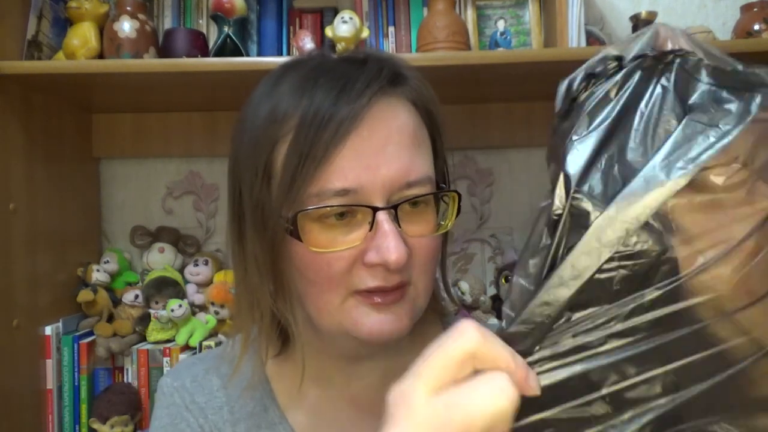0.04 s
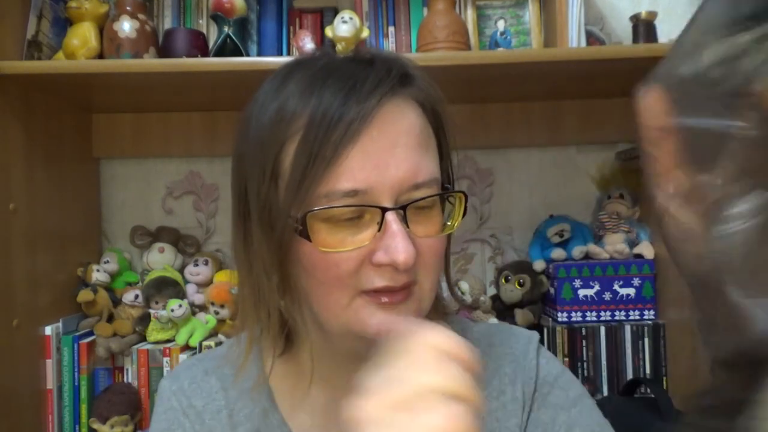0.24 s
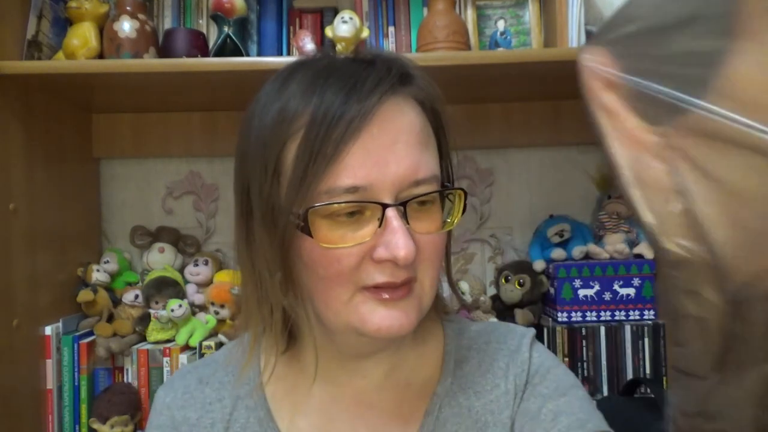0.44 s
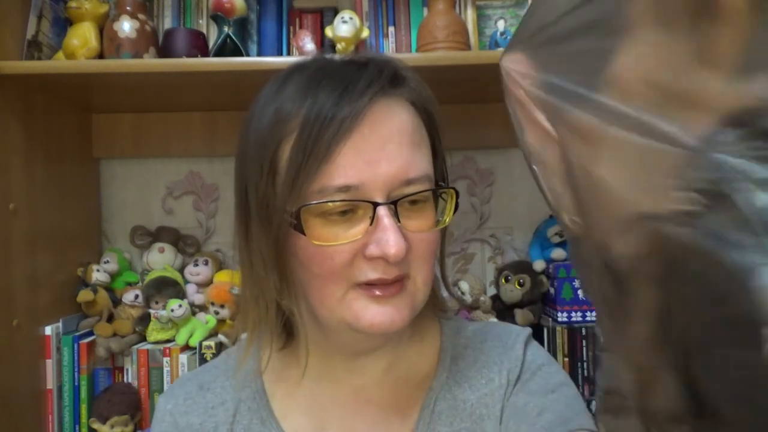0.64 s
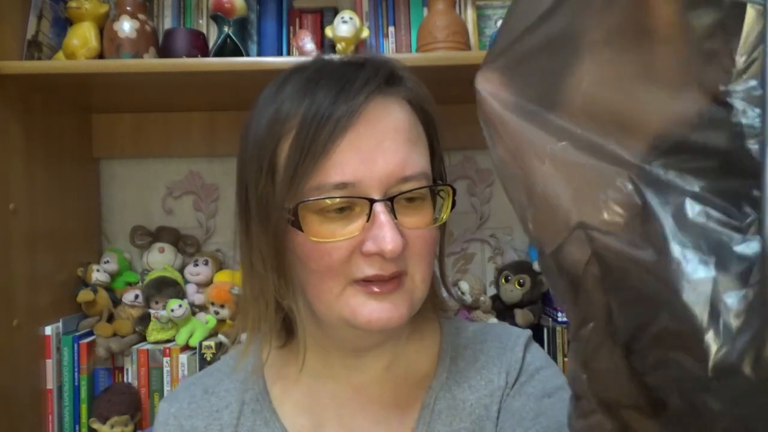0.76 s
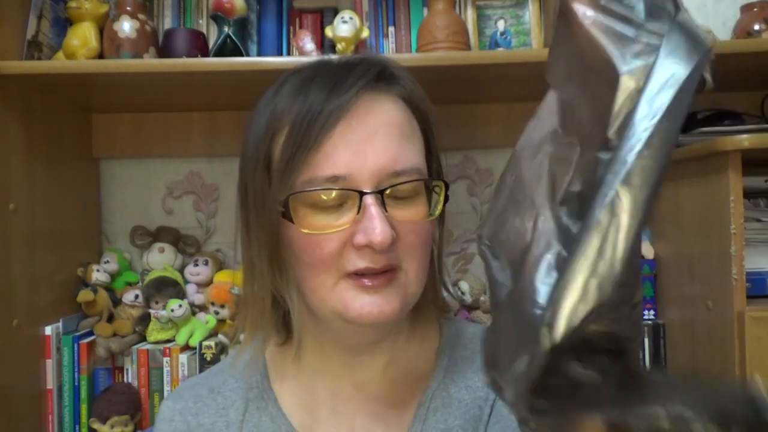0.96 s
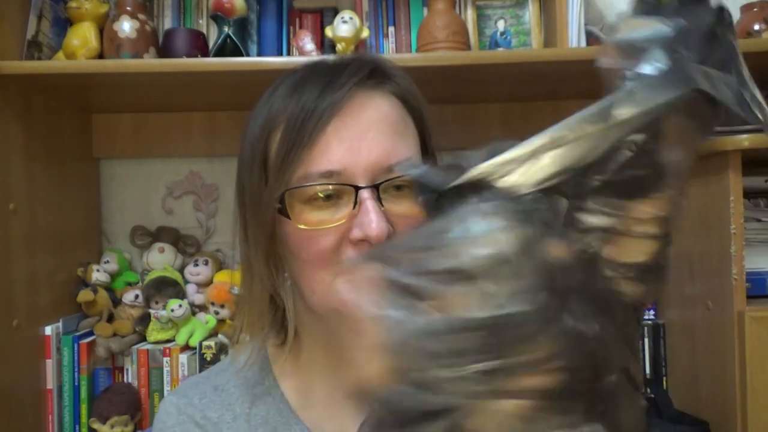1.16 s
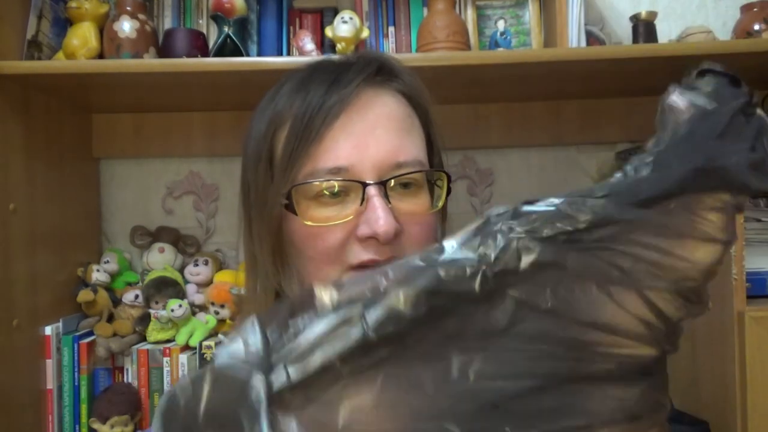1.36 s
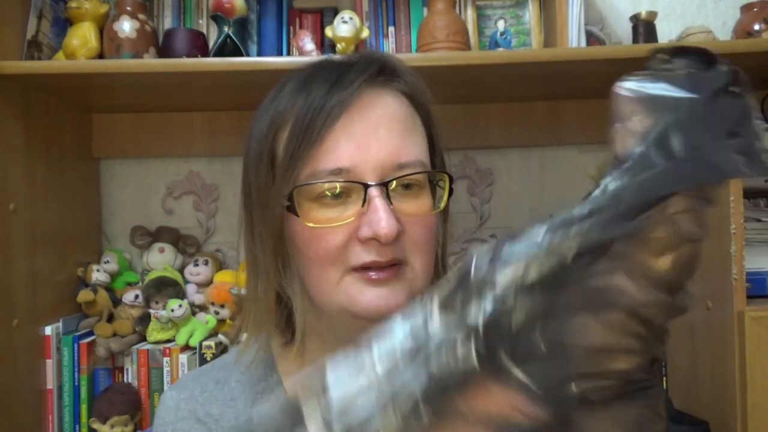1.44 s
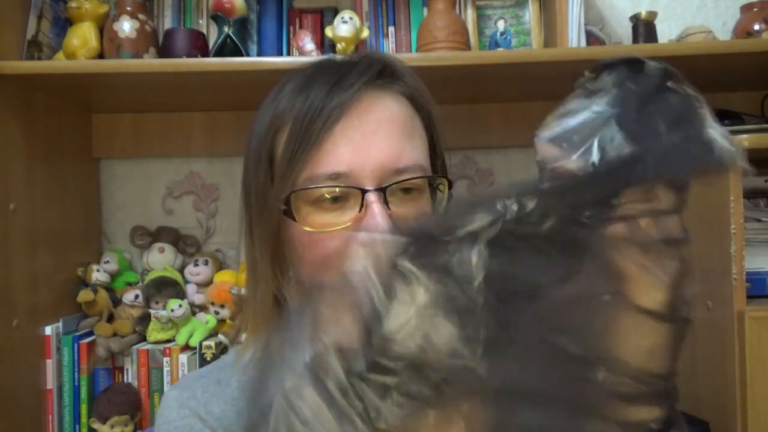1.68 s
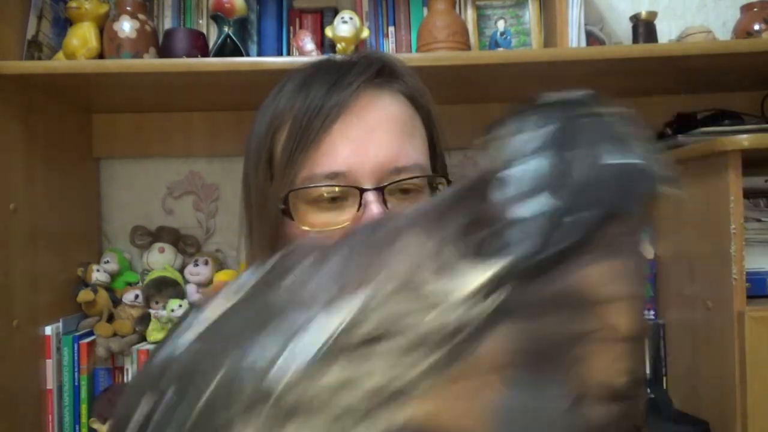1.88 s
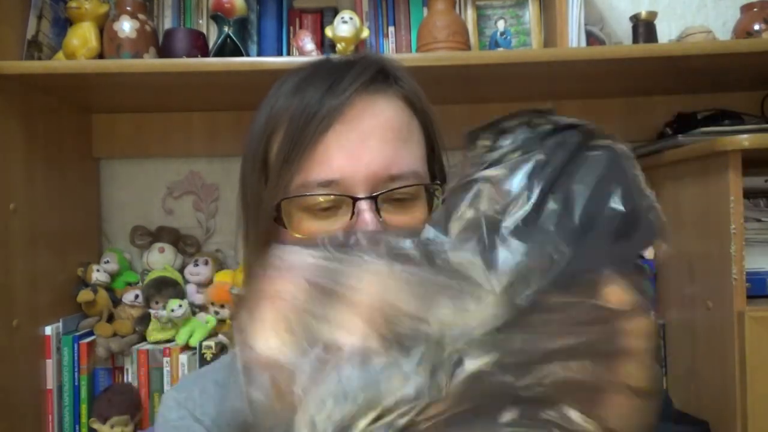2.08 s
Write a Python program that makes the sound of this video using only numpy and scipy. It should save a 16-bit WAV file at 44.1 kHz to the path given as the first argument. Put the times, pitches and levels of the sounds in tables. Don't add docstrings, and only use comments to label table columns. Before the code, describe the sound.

A thin plastic rubbish bag crinkles loudly and densely close by, tugged in uneven bursts indoors

```python
import sys
import numpy as np
from scipy import signal
from scipy.fft import rfft, irfft, next_fast_len
from scipy.io import wavfile
from scipy.ndimage import uniform_filter1d, map_coordinates

SR = 44100
rng = np.random.default_rng(int(sys.argv[2]) if len(sys.argv) > 2 else 0)


def transcribe(u):
    v = np.clip(np.atleast_2d(u).T, -1, 1)
    q = np.round(v * 32767).astype(np.int16)
    wavfile.write(sys.argv[1], SR, q)


def gain_from_db(level_db):
    decades = np.asarray(level_db, float) / 20
    return 10 ** decades


N = 93227


def unit(x):
    return x / np.sqrt(np.mean(x ** 2) + 1e-20)


def along(points, hz):
    f, v = np.transpose(points)
    return np.interp(np.log(hz + 1), np.log(f + 1), v)


def curve(rows, column=1):
    columns = np.transpose(rows)
    return np.interp(np.arange(N) / SR, columns[0], columns[column])


def wobble(rate_hz):
    knots = rng.standard_normal(int(N * rate_hz / SR) + 4)
    return map_coordinates(knots, [np.arange(N) * rate_hz / SR])


def coloured(x, points, causal=True):
    m = 2 * next_fast_len(N // 2 + SR // 8)
    gain = gain_from_db(along(points, np.fft.rfftfreq(m, 1 / SR)))
    cepstrum = irfft(np.log(gain), m)
    if causal:
        cepstrum[1:m // 2] *= 2
        cepstrum[m // 2 + 1:] = 0
    return irfft(rfft(x, m) * np.exp(rfft(cepstrum)), m)[..., :N]


def grains(s, hz, size, cycles, count):
    k = np.arange(count)
    turns = hz[:, None] * k / SR
    envelope = np.exp(-np.log(10) * turns / cycles) * (1 - np.exp(-turns / 0.96))
    shapes = size[:, None] * np.sin(2 * np.pi * turns) * envelope
    at = np.round(s * SR).astype(int)[:, None] + k
    return np.bincount(at.ravel(), shapes.ravel(), N + count)[:N]


# t/s, level/dB
HANDLING = [(0, -21.5), (.072, -22.5), (.11, -17.5), (.165, -27), (.27, -17.5), (.33, -20.5), (.375, -27.5),
            (.52, -27), (.6, -22.5), (1.0, -17.5), (1.3, -19.5), (1.34, -26), (1.585, -22.5), (1.615, -17),
            (1.73, -17.5), (1.79, -25.5), (1.99, -23), (2.05, -22)]
# middle t/s, length/s, lift/dB
TUGS = [(0.03, 0.023, 0.5), (0.078, 0.013, -2), (0.143, 0.014, 3.5), (0.189, .03, 4), (0.247, .008, 2),
        (0.33, 0.029, -0.5), (0.342, 0.016, 1.5), (.395, .025, -2), (0.417, 0.014, 3), (0.472, 0.032, 4.5),
        (0.597, .04, 3.5), (0.642, 0.057, 3), (0.746, 0.038, 2), (0.818, .03, -3), (0.884, .05, 1),
        (.918, 0.033, -4), (0.97, 0.018, -3.5), (1.006, 0.061, 1), (1.162, 0.048, 2), (1.205, 0.038, 2.5),
        (1.437, 0.032, 3), (1.483, .022, 1), (1.52, .03, -1.5), (1.66, .03, 0.5), (1.689, 0.029, 2),
        (1.749, 0.029, 2), (1.838, 0.071, 5), (1.947, 0.026, 0.5), (1.966, .015, -1), (2.067, 0.097, 3)]


def effort_db():
    t = np.arange(N) / SR
    tugs = sum(lift_db * np.exp(-.5 * ((t - s) / (0.35 * length_s)) ** 2)
               for s, length_s, lift_db in TUGS)
    tremor = 0.49 * wobble(45.2) + 0.76 * wobble(160)
    return curve(HANDLING) + tugs + tremor


CREASES_PER_S, RING_CYCLES, TICK_DB = 9000, 1.68, -2
SIZE_SPREAD_DB, SPARSER_PER_DB, BIGGEST_DB = 2, 0.045, 11


def crackle(level_db):
    count = int(CREASES_PER_S * N / SR)
    ring_u, hz_u, ring_size_u, sign_u, tick_u, tick_size_u = rng.random((6, count))
    spread_db = SIZE_SPREAD_DB * (1.5 + SPARSER_PER_DB * (level_db.mean() - level_db))

    def size(at, u):
        db = np.minimum(-spread_db[at] * np.log(1 - u), BIGGEST_DB)
        return gain_from_db(db) * np.sign(sign_u - .5)

    s = ring_u * N / SR
    hz = 1200 + 15500 * hz_u
    ring_size = size((s * SR).astype(int), ring_size_u) * np.sqrt(hz)
    rings = grains(s, hz, ring_size, RING_CYCLES, count=96)
    tick_at = (tick_u * N).astype(int)
    ticks = np.bincount(tick_at, size(tick_at, tick_size_u), N)
    return unit(rings) + gain_from_db(TICK_DB) * unit(ticks)


def slide():
    z = signal.stft(rng.standard_normal(N), nperseg=256)[2]
    patches = uniform_filter1d(rng.standard_normal(z.shape), 5, 0)
    patches = uniform_filter1d(patches, 12, 1)
    return unit(signal.istft(z * gain_from_db(2.7 * unit(patches)), nperseg=256)[1][:N])


SLIDE_DB = -0.5
# f/Hz, level/dB
FILM_SPECTRUM = [(25, -29), (60, -20), (500, -12.5), (1200, -14.5), (4000, -10.5), (9000, -6.5),
                 (15500, -10)]


def rustle():
    level_db = effort_db()
    source = crackle(level_db) + gain_from_db(SLIDE_DB) * slide()
    return gain_from_db(level_db) * unit(coloured(source, FILM_SPECTRUM))


# f/Hz, level/dB
TAUT_CHANGE = [(100, -4), (1000, -2.5), (4000, -1.5), (7000, -1), (11000, .5), (13000, 2), (15500, 4)]


def stretch(slack, taut):
    return (1 - taut) * slack + taut * coloured(slack, TAUT_CHANGE, causal=False)


def room_air():
    shape = [(25, -34), (60, 1.5), (300, -3.5), (2000, -17), (16000, -40)]  # f/Hz, level/dB
    return gain_from_db(-61.5) * unit(coloured(rng.standard_normal(N), shape))


# f/Hz, level/dB
SHADE_CHANGE = [(300, 5.5), (3000, 2.5), (6500, .5), (8000, -4), (9500, -10), (10900, -13), (11700, 0),
                (15000, 5.5)]


def arm_shade(front, shade):
    return (1 - shade) * front + shade * coloured(front, SHADE_CHANGE, causal=False)


# f/Hz, t60/s
ROOM_T60 = [(200, 0.31), (2000, 0.26), (12000, 0.11)]
ROOM_CHANGES_S = .15


def room(x):
    hop = int(ROOM_CHANGES_S * SR)
    out = np.zeros((2, N + SR))
    padded = np.pad(x, (hop, 2 * hop))
    fade = np.hanning(2 * hop) ** .5
    for at in range(-hop, N, hop):
        hz, t, z = signal.stft(rng.standard_normal((2, SR // 3)), SR, nperseg=256)
        decay_db = -60 * t / along(ROOM_T60, hz)[:, None]
        tail = signal.istft(z * gain_from_db(decay_db), SR, nperseg=256)[1]
        tail = tail / np.linalg.norm(tail[0])
        piece = padded[at + hop:at + 3 * hop] * fade
        wet = signal.fftconvolve(piece[None], tail, axes=1)
        out[:, at + hop:][:, :wet.shape[1]] += wet
    return out[:, hop - SR // 400:][:, :N]


# f/Hz, level/dB
PORTS_UNLIKE = [(100, -19), (400, -22.5), (1500, -33.5), (6000, -20), (9000, -17.5), (11300, -15.5),
                (12500, -30)]
# f/Hz, level/dB
RIGHTWARD = [(100, -32), (250, -18), (600, -7), (1500, -13.5), (3000, -9.5), (5000, -15.5), (8000, -20),
             (15000, -23)]


def two_ports(mid, other, aside):
    side = coloured(other, PORTS_UNLIKE) - aside * coloured(mid, RIGHTWARD, causal=False)
    return np.array([mid + side, mid - side])


# t/s, level/dB, f/Hz
SNAPS = [(0.0202, -10, 9000), (.082, -5, 12000), (.167, -16, 9500), (0.2297, -2.5, 6000),
         (0.3758, -7, 8050), (.412, -10.5, 6000), (0.4135, -9, 12400), (0.43, -8, 12500),
         (0.837, -3, 11200), (0.8691, -3, 8200), (.319, -4, 12500), (.352, -12, 13000), (1.041, 2, 9100),
         (1.3243, -10, 9000)]
SNAP_DB = 3


def snaps():
    s, db, hz = np.transpose(SNAPS)
    size = gain_from_db(db + SNAP_DB)
    crack = grains(s - .0002, .8 * hz, size, 1.3, count=32)
    high_ring = grains(s, hz, 0.59 * size, 6.5, count=128)
    low_ring = grains(s + .0003, 0.59 * hz, .4 * size, 2.8, count=128)
    return crack + high_ring + low_ring


# t/s, level/dB, f/Hz
FLAPS = [
    (.115, -43, 70),
    (0.247, -31, 160),
    (.275, -34, 86),
    (1.07, -35, 120),
    (1.13, -40, 85),
    (1.21, -36, 168),
    (1.715, -35, 70),
    (2.076, -28, 100),
]


def flaps():
    s, db, hz = np.transpose(FLAPS)
    return grains(s, hz, gain_from_db(db), 3.3, count=3000)


# t/s, offset to right/0-1, arm shade/0-1, film tension/0-1
PLACE = [(0, 0.75, 0.5, 0.06), (.14, 0.7, 0, 0.17), (.215, 0.8, 0.34, .03), (.24, 0.86, 0.7, .3),
         (.33, .95, 0.7, 0.8), (.37, 1, 0.7, 0.05), (.47, 1, 0.64, 0.23), (.56, 0.96, 0.14, 0.38),
         (.9, 0.73, 0.32, .3), (1.15, 0.6, -0.0064, 0), (1.22, 0.13, 0, 0.44), (1.35, 0.06, 0.22, 1),
         (1.6, 0.38, 0.13, 0.77), (2.11, 0.01, 0, 0.36)]
ROOM_DB = -13.5


def scene():
    aside, shade, taut = (np.clip(curve(PLACE, column=k), 0, 1) for k in range(1, 4))
    bag = stretch(rustle() + snaps(), taut)
    near, other = room(bag)
    front = bag + gain_from_db(ROOM_DB) * near + room_air() + flaps()
    return two_ports(arm_shade(front, shade), other, aside)


def roll_off(x):
    return signal.sosfilt(signal.butter(12, 16090, fs=SR, output="sos"), x)


# f/Hz, level/dB
CAPSULE = [(4200, 0.56), (5100, 3), (5800, 7.5), (7500, 6), (9000, 5), (12300, 8), (13800, 1.5),
           (15700, -2.5)]
CEILING, KNEE, TOP_HZ = .78, 4, 15750


def record(dry):
    x = coloured(dry, CAPSULE)
    x = x / (1 + np.abs(x / CEILING) ** KNEE) ** (1 / KNEE)
    m = next_fast_len(N + SR // 4)
    passed = np.fft.rfftfreq(m, 1 / SR) < TOP_HZ
    mix = irfft(rfft(x, m) * passed, m)[:, :N]
    return roll_off(mix)


dry = scene()
out = record(dry)
transcribe(out)
```